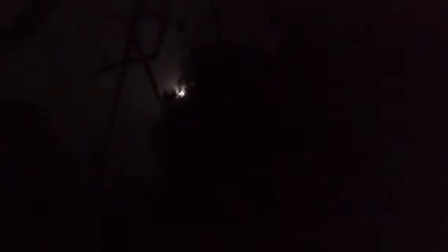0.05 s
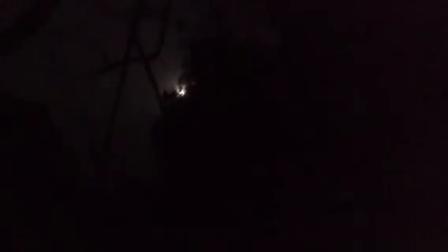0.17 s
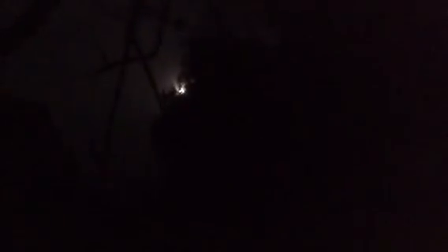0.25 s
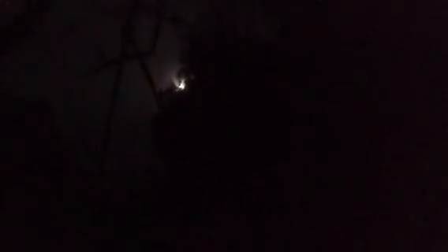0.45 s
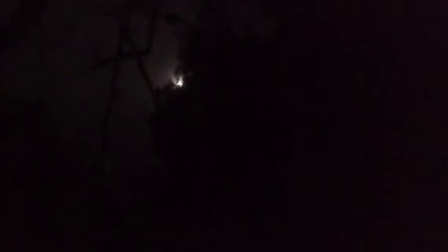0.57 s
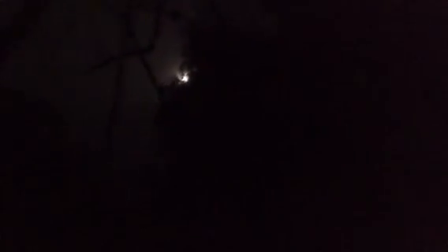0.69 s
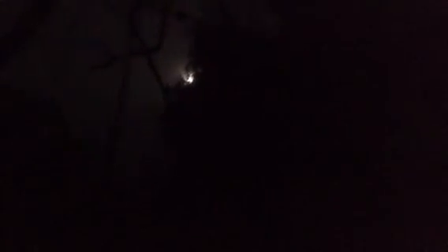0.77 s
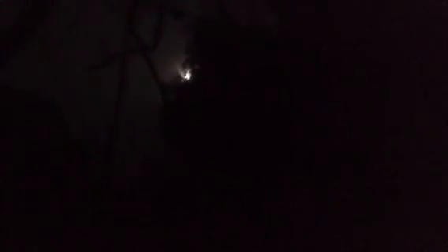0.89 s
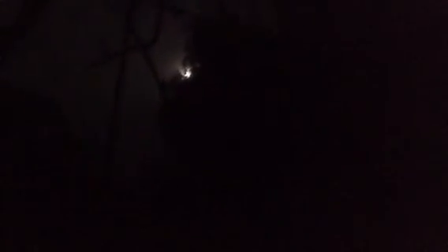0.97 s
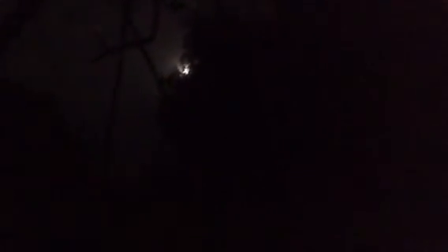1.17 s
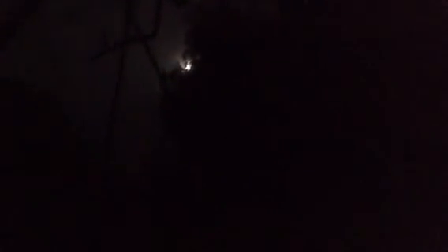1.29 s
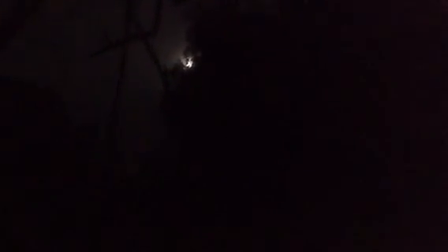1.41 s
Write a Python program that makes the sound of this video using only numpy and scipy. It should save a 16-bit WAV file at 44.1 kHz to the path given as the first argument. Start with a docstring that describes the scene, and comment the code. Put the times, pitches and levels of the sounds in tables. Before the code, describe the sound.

A bird gives two low, rising whistles over a steady insect hiss at night.

```python
"""A wood at night, on one microphone. Out in front, a bird gives the same low, upward-sliding whistle
twice; its throat favours the second harmonic. Trees near and far scatter each call into a short tail.
Behind it a chorus of insects hisses, a few others tick, and one cricket chirps faintly in steady time.
From the distance come a low rumble, soft air and a faint drone."""
import sys
import numpy as np
from scipy import signal
from scipy.fft import rfft, irfft, next_fast_len
from scipy.io import wavfile
from scipy.ndimage import uniform_filter1d, map_coordinates

SR = 44100
rng = np.random.default_rng(int(sys.argv[2]) if len(sys.argv) > 2 else 0)


def store_pcm(level_fs):
    """Save levels as 16-bit WAV."""
    pcm = np.round(np.clip(level_fs, -1, 1) * 32767).astype(np.int16)
    wavfile.write(sys.argv[1], SR, np.atleast_2d(pcm).T)


N = 63945
T = np.arange(N) / SR

# the bird's calls: (start [s], gain [dB], pitch [ratio], time from start to a dip in harmonic 2 [s])
CALLS = [(.06, -1.5, 1.0, 0.0858), (.682, -2, 0.99, .092)]
# upward slide of a call: (time from its start [s], fundamental [Hz])
CALL_PITCH = [(0, 369), (.028, 482.3), (.044, 539.5), (.058, 624.4), (.072, 666.5), (.1, 718.4),
              (.134, 792), (.146, 890), (.163, 980)]
# swell and fall of a call: (time from its start [s], relative level [dB])
CALL_ENVELOPE = [(0, -61.5), (.028, -59.5), (.048, -40), (.06, -40), (.074, -35), (.088, -37.5),
                 (.103, -32), (.134, -32.5), (.143, -38), (.152, -40.5), (.163, -53)]
# harmonics at the syrinx: (harmonic [number], relative level [dB])
SYRINX_HARMONICS = [(1, -13.5), (2, -2), (3, -29), (4, -38.5), (5, -59), (6, -47), (7, -63)]
# resonances of the throat: (frequency [Hz], gain [dB])
THROAT_RESPONSE = [(400, 6), (560, 5), (680, -3.5), (780, -5), (880, -2), (1000, 4.5), (1150, 1.5),
                   (1600, 4), (1800, -6.5), (1950, -10.5), (2120, -2), (2330, -11), (2550, -4.5),
                   (3000, -5), (3300, -11), (4150, -5), (4400, 8.5), (4650, -4), (5500, -5)]
# breath in the whistle: (frequency [Hz], relative density [dB])
BREATH_SPECTRUM = [(300, -28), (700, -7), (1400, 12), (2000, -1.5), (2700, -20.5), (3500, -16.5),
                   (4600, -15.5), (6000, -36), (9000, -52)]
# colour of the echoes against the direct call: (frequency [Hz], gain [dB])
ECHO_RESPONSE = [(500, -3.5), (800, -3.5), (1100, -2), (1320, 4), (1520, -2), (1720, 3), (1950, 2),
                 (2250, 12), (2700, 7.5), (3400, 11.5), (4400, 9), (6000, -4)]
# decay among the trees at middle distance: (frequency [Hz], time to fall 60 dB [s])
TREE_DECAY = [(500, 0.32), (1500, 0.56), (4500, 0.9), (9000, .3)]
# the cricket's chirps: (start [s], peak level of the fundamental [dB])
CRICKET_CHIRPS = [(-.01, -78), (0.133, -74.5), (.27, -78), (.403, -78.5), (.535, -78), (0.673, -75.5),
                  (0.814, -74), (0.961, -78), (1.096, -76), (1.233, -75), (1.374, -80)]
# faint insect ticks: (centre time [s], frequency [Hz], level [dB])
INSECT_TICKS = [(.412, 3426, -80), (.678, 3335, -78), (.968, 4850, -82)]
# hiss of the massed insects: (frequency [Hz], relative density [dB])
CHORUS_SPECTRUM = [(3180, -54), (5400, -20.5), (5810, -15.5), (6240, -4), (7040, 0.5), (7700, -7.5),
                   (8640, -7), (11800, -23), (13900, -21), (15000, -41)]
# insects nearer the microphone: (frequency [Hz], width [Hz], level [dB], swell [dB])
NEAR_INSECTS = [(6360, 130, -78.5, 3), (6860, 150, -77, 3), (7270, 90, -79.5, 9.5)]
# rise and fall of the distant rumble: (time [s], relative level [dB])
RUMBLE_ENVELOPE = [(0.0, -57.5), (0.064, -63.5), (0.08, -58), (0.738, -67.5), (0.77, -60), (0.794, -70.5),
                   (1.074, -59.5), (1.138, -66.5), (1.45, -63.5)]
# colour of the rumble: (frequency [Hz], relative density [dB])
RUMBLE_SPECTRUM = [(20, -33), (35, -13.5), (55, 2.5), (75, -4), (100, -0.5), (135, -5.5), (190, -14),
                   (400, -49)]
# soft night air: (frequency [Hz], relative density [dB])
AIR_SPECTRUM = [(82, -30), (140, -0.5), (427, -7), (697, -11.5), (775, -11), (931, -12.5), (1190, -15),
                (1470, -17.5), (2260, -28.5), (2760, -25.5), (2980, -28), (4230, -32.5), (5400, -33.5),
                (7020, -57), (11900, -120)]
# tones of a far-off drone: (frequency [Hz], level [dB])
DRONE_TONES = [(109, -71), (199, -76.5), (228, -74.5), (275, -76.5), (319, -80)]


def whistle(start, gain_db, pitch_ratio, dip_at, jitter=0.0032, shimmer_db=1.2, flutter_per_s=260):
    """One rising call: syrinx harmonics shaped by the throat, slightly unsteady, with a trace of breath."""
    t = T - start
    slide_hz = uniform_filter1d(np.interp(t, *np.transpose(CALL_PITCH)), size=220)
    hz = pitch_ratio * slide_hz * (1 + jitter * wobble(flutter_per_s))
    phase = 2 * np.pi * np.cumsum(hz) / SR
    length_s = CALL_ENVELOPE[-1][0] + 0.0035
    gate = np.clip(np.minimum(t, length_s - t) / 0.0017, 0, 1)  # 1.7 ms fade at each end
    level_db = gain_db + np.interp(t, *np.transpose(CALL_ENVELOPE)) + shimmer_db * wobble(flutter_per_s)
    dip = 1 - 0.71 * np.exp(-((t - dip_at) / 0.0041) ** 2)  # the main harmonic dips for a few ms
    tone = np.zeros(N)
    for k, db in SYRINX_HARMONICS:
        harmonic = amp(db + along(THROAT_RESPONSE, k * hz)) * np.sin(k * phase)
        tone += harmonic * dip if k == 2 else harmonic
    breath = amp(-26.5) * noise(BREATH_SPECTRUM)
    return gate * amp(level_db) * (np.sqrt(2) * tone + breath)


def bird(near_t60_s=0.23, far_t60_s=2.66):
    """Both calls reach the microphone directly, then off near, middle and distant trees."""
    sound = np.zeros(N)
    for row in CALLS:
        call = whistle(*row)
        reflected = filtered(call, lambda hz: amp(along(ECHO_RESPONSE, hz)))
        middle = amp(-16.5) * tree_echoes(reflected, TREE_DECAY)
        near = amp(-12) * tree_echoes(reflected, [(1000, near_t60_s)])  # closest trunks and the ground
        far = amp(-29) * tree_echoes(reflected, [(1000, far_t60_s)])
        sound += call + near + middle + far
    return sound


def tree_echoes(x, t60s, delay_s=0.01, build_s=0.013):
    """Trees scatter a sound into diffuse echoes that build up, then die at each frequency's own speed."""
    hz, t, spectrum = signal.stft(rng.standard_normal(SR), SR, nperseg=256)
    decay = amp(-60 * t / along(t60s, hz)[:, None])
    tail = signal.istft(spectrum * decay, SR, nperseg=256)[1]
    since_arrival = np.maximum(np.arange(len(tail)) / SR - delay_s, 0)
    tail *= 1 - np.exp(-since_arrival / build_s)
    return signal.fftconvolve(x, tail / np.linalg.norm(tail))[:N]


def cricket(pitch_hz=2785, rise_hz=69.3, pulse_s=0.031, weak_delay_s=0.052, weak_db=-10.5):
    """One faint cricket: each chirp is a strong rising pulse and a weak one, blurred by the trees."""
    song = np.zeros(N)
    for start, db in CRICKET_CHIRPS:
        for t, level_db in ((T - start, db), (T - start - weak_delay_s, db + weak_db)):
            progress = np.clip(t / pulse_s, 0, 1)
            hz = pitch_hz + rise_hz * (progress - 0.5)
            roughness = 0.6 * wobble(110)
            phase = 2 * np.pi * np.cumsum(hz) / SR + roughness
            tone = np.sin(phase) + amp(2.5) * np.sin(3 * phase)
            song += np.sqrt(2) * amp(level_db) * np.sin(np.pi * progress) * tone
    return song + amp(-11) * tree_echoes(song, TREE_DECAY)


def insect_ticks(half_length_s=0.011):
    """Brief, soft rasps of other insects, each a burst of narrow noise."""
    return sum(amp(db) * np.exp(-((T - centre) / half_length_s) ** 2) * narrow_noise(hz, width_hz=450)
               for centre, hz, db in INSECT_TICKS)


def insect_chorus(hiss_db=-67):
    """Many insects merge into a hiss behind the bird; a few nearer ones swell out of it."""
    chorus = amp(hiss_db + 0.25 * wobble(25)) * noise(CHORUS_SPECTRUM)
    for hz, width_hz, db, swell_db in NEAR_INSECTS:
        chorus += amp(db) * unit(narrow_noise(hz, width_hz) * amp(swell_db * wobble(28)))
    return chorus


def distant_night(rumble_trim_db=-1, air_db=-64):
    """Farthest from the microphone: low rumble, soft air and a faint wavering drone."""
    rumble = amp(np.interp(T, *np.transpose(RUMBLE_ENVELOPE)) + rumble_trim_db) * noise(RUMBLE_SPECTRUM)
    air = amp(air_db + 0.26 * wobble(9.9)) * noise(AIR_SPECTRUM)
    drone = sum(amp(db) * narrow_noise(hz, width_hz=8.96) for hz, db in DRONE_TONES)
    return rumble + air + drone


def amp(db):
    """Decibels to gain."""
    return 10 ** (np.asarray(db) / 20)


def unit(x):
    """Scale to rms 1."""
    return x / np.sqrt(np.mean(x ** 2) + 1e-20)


def along(points, hz):
    """Interpolate (frequency [Hz], value) points on a log frequency axis."""
    freqs, values = np.transpose(points)
    return np.interp(np.log(hz + 1), np.log(freqs + 1), values)


def wobble(knots_per_s):
    """A smooth random curve around zero."""
    return map_coordinates(rng.standard_normal(N // 8), [T * knots_per_s + 2])


def filtered(x, response):
    """Apply a gain given as a function of frequency."""
    size = next_fast_len(N + SR // 2)
    return irfft(rfft(x, size) * response(np.fft.rfftfreq(size, 1 / SR)), size)[:N]


def noise(spectrum):
    """Coloured noise of rms 1."""
    return unit(filtered(rng.standard_normal(N), lambda hz: amp(along(spectrum, hz))))


def narrow_noise(hz, width_hz):
    """A band of noise around one pitch, of rms 1."""
    phase = 2 * np.pi * hz * T
    return unit(wobble(width_hz) * np.cos(phase) + wobble(width_hz) * np.sin(phase))


def scene():
    """The bird in front, insects behind and the distance beyond, at one microphone."""
    return (bird() + cricket() + insect_ticks() + insect_chorus() + distant_night())[None]


def record(dry, band_limit_hz=15250):
    """The recorder keeps nothing above its band limit."""
    return np.array([filtered(channel, lambda hz: hz < band_limit_hz) for channel in dry])


dry = scene()
out = record(dry)
store_pcm(out)
```